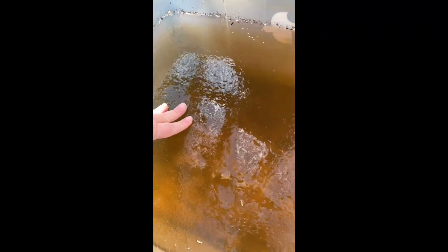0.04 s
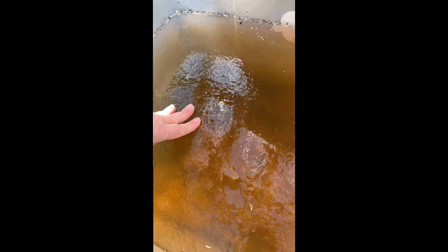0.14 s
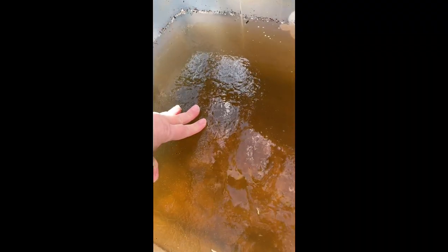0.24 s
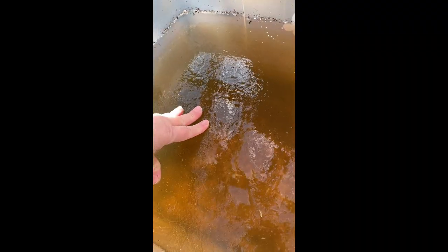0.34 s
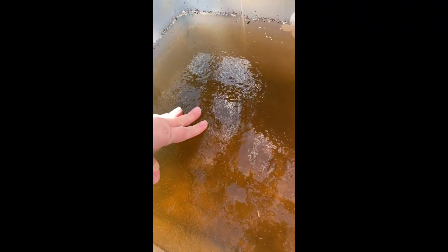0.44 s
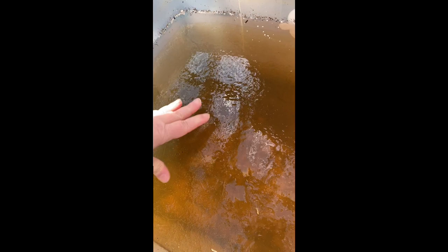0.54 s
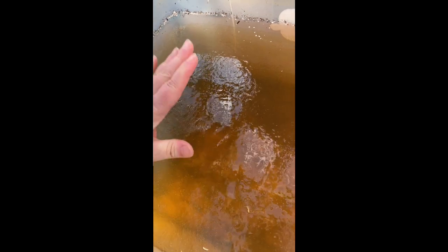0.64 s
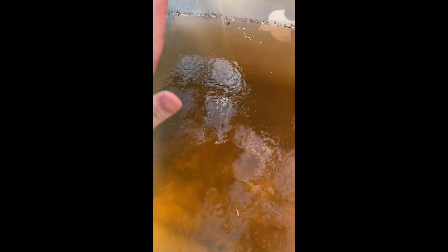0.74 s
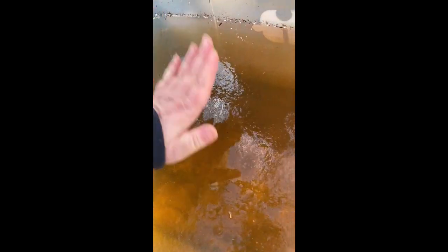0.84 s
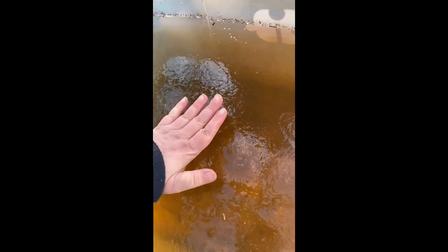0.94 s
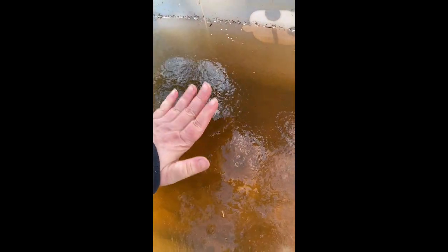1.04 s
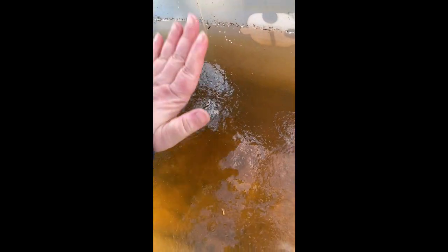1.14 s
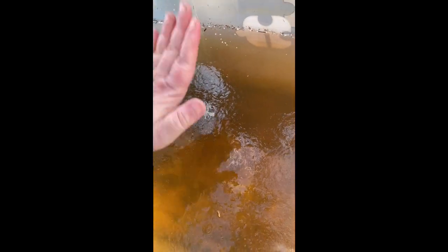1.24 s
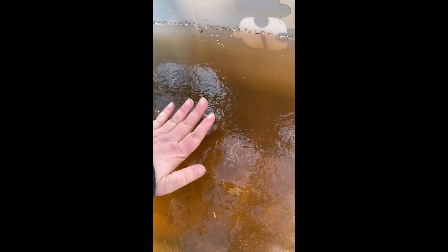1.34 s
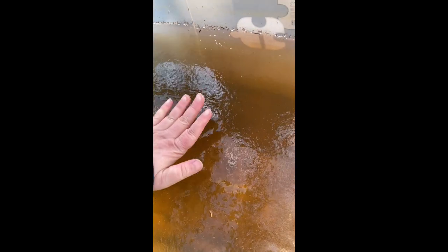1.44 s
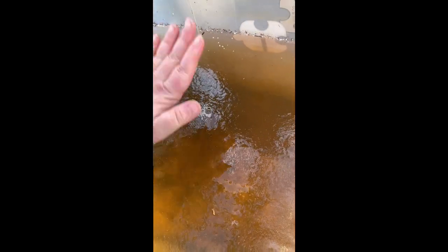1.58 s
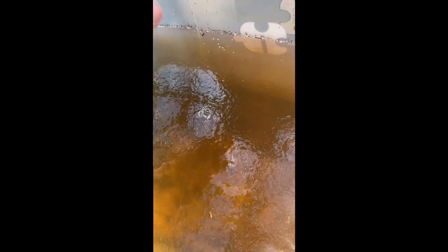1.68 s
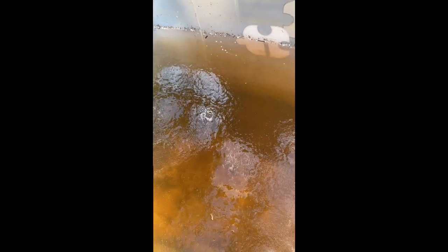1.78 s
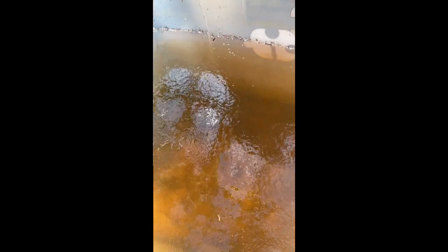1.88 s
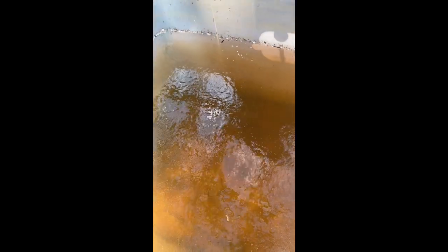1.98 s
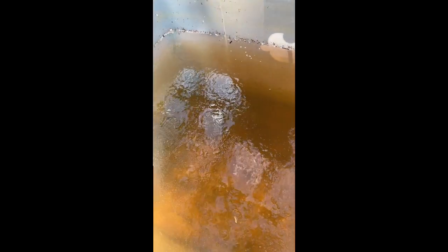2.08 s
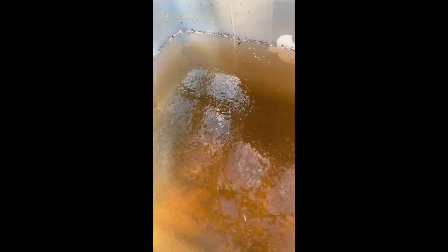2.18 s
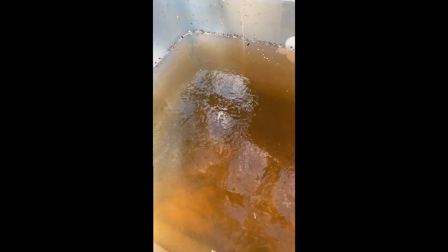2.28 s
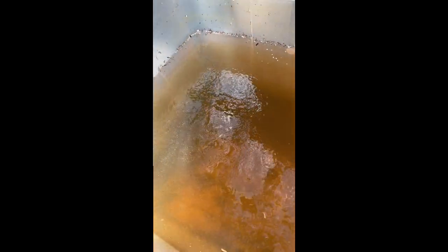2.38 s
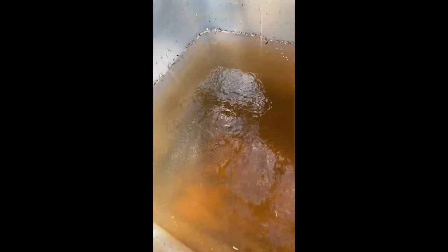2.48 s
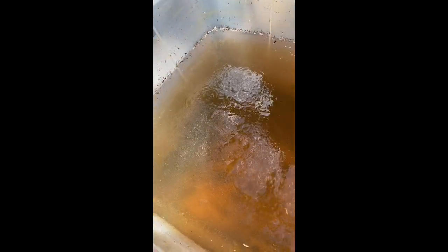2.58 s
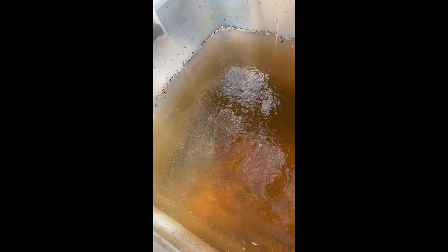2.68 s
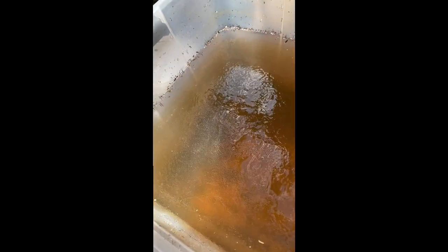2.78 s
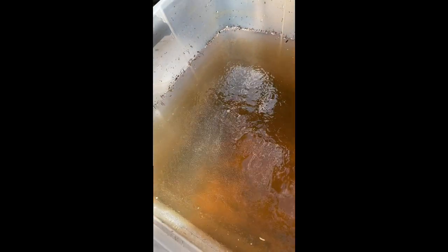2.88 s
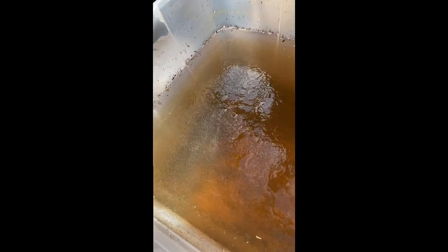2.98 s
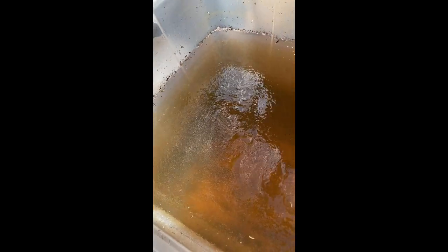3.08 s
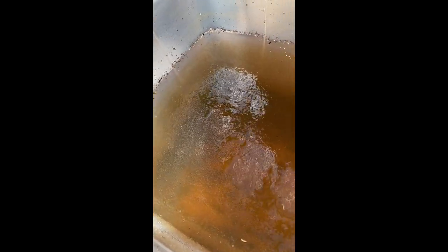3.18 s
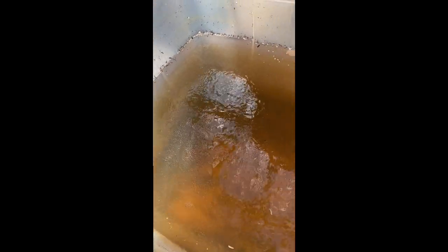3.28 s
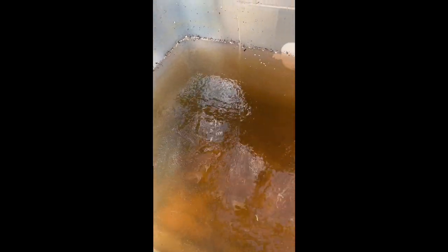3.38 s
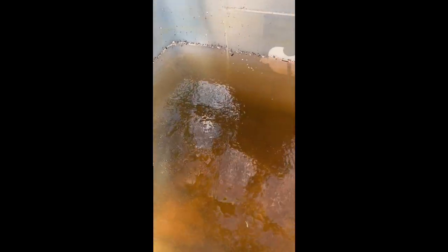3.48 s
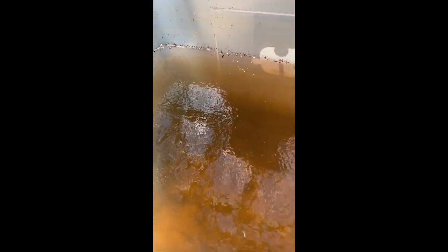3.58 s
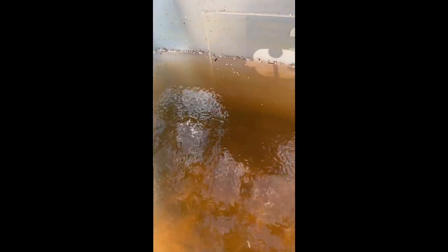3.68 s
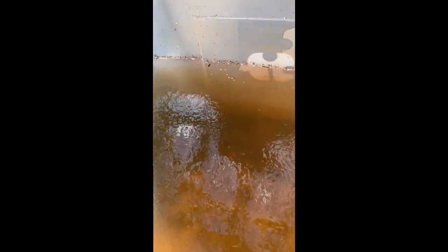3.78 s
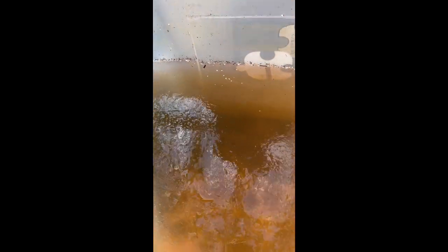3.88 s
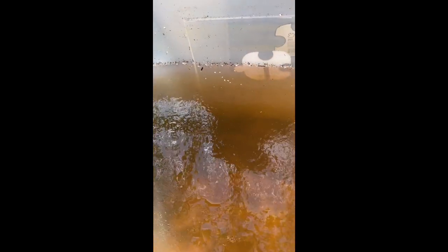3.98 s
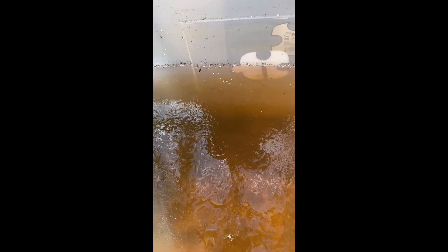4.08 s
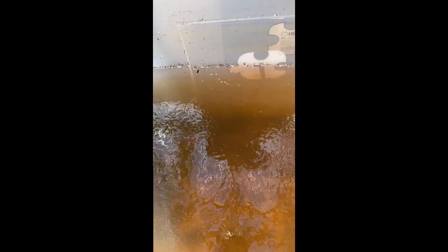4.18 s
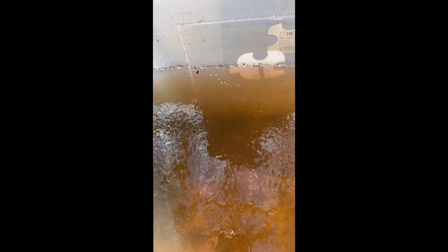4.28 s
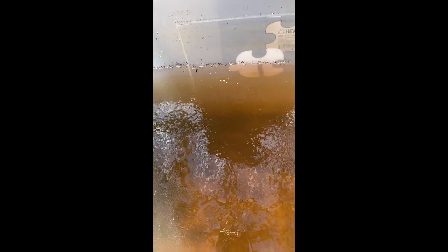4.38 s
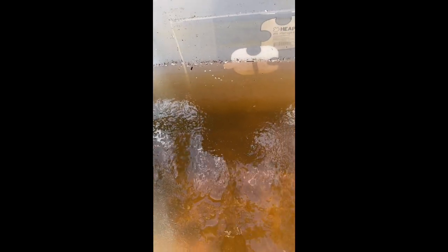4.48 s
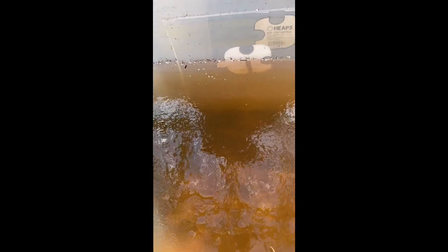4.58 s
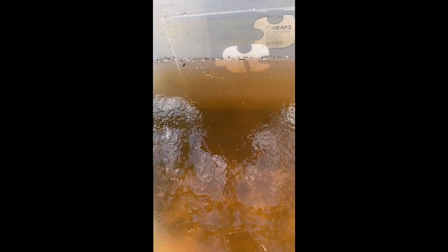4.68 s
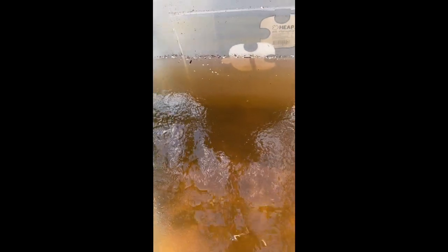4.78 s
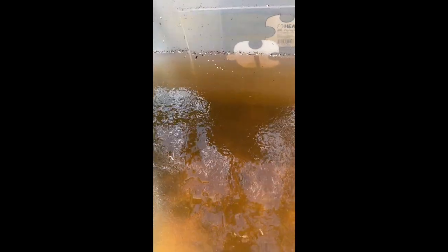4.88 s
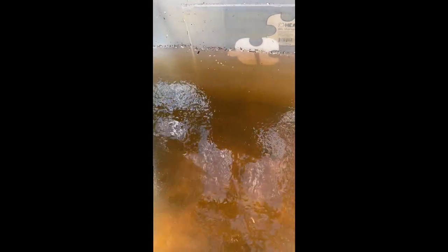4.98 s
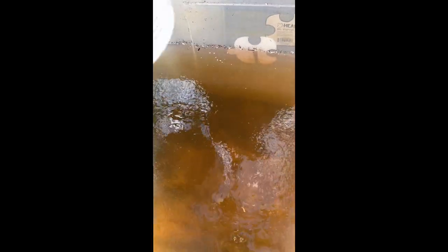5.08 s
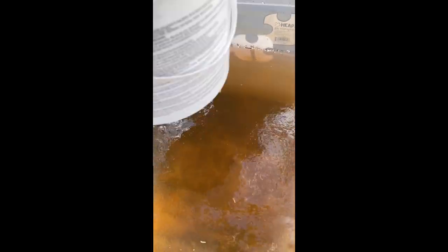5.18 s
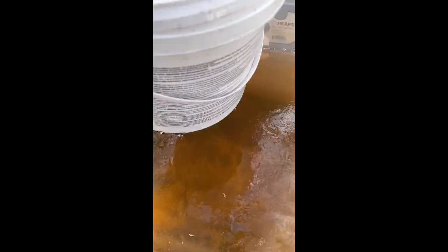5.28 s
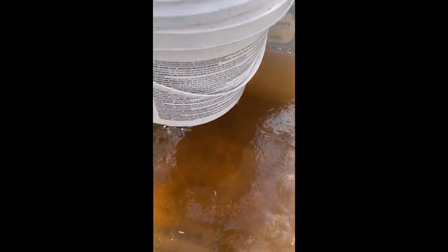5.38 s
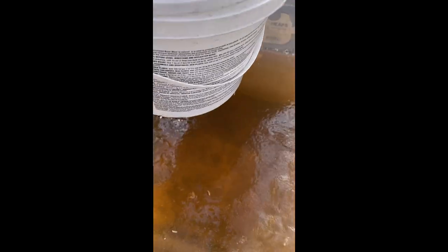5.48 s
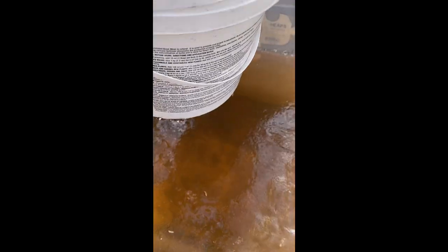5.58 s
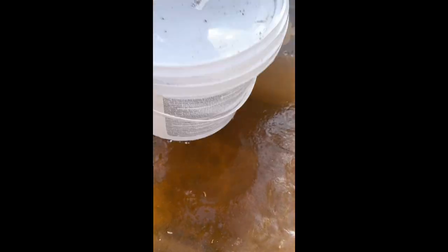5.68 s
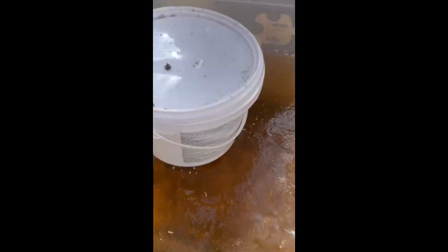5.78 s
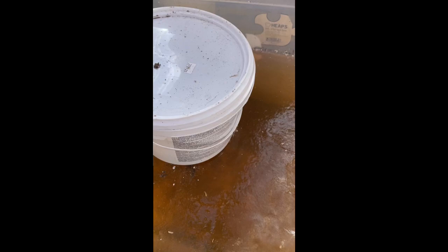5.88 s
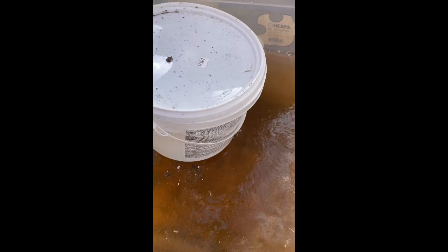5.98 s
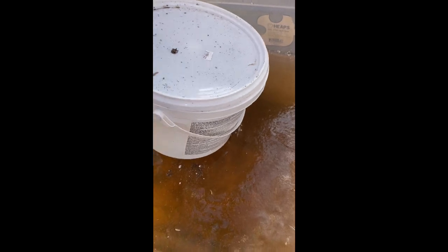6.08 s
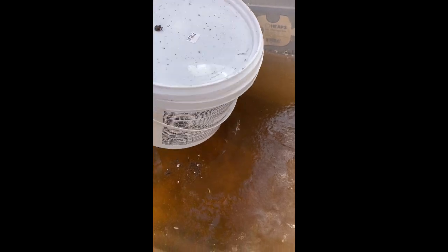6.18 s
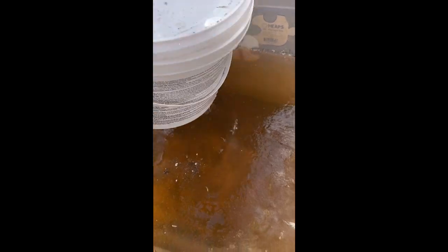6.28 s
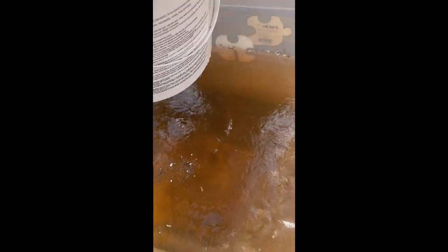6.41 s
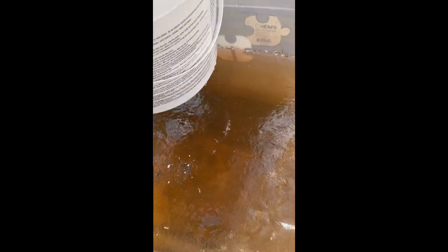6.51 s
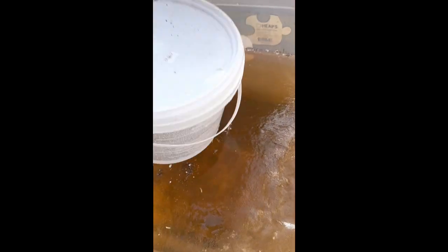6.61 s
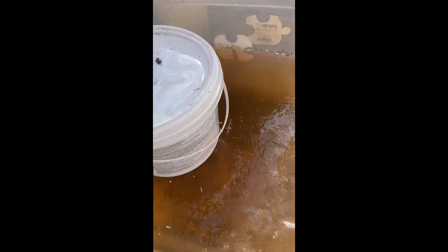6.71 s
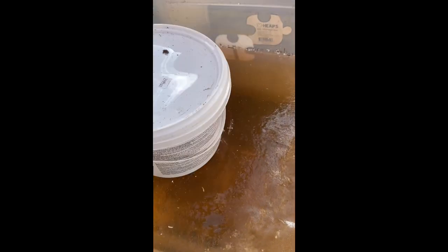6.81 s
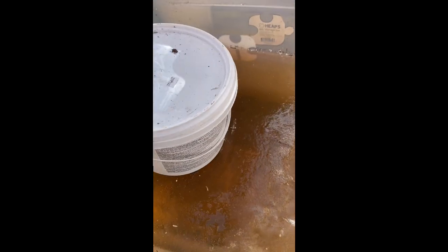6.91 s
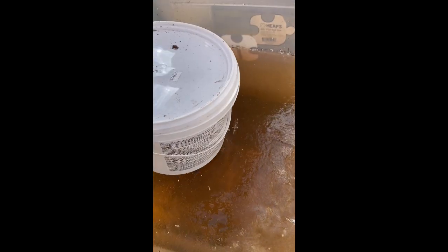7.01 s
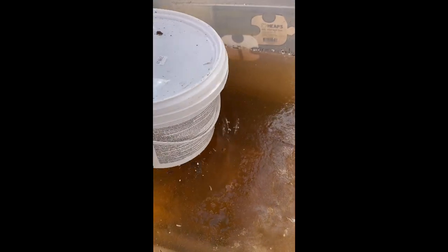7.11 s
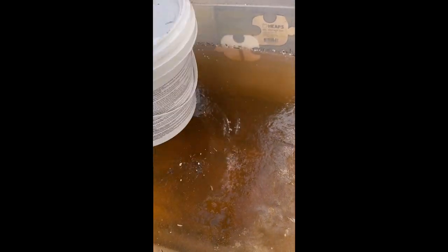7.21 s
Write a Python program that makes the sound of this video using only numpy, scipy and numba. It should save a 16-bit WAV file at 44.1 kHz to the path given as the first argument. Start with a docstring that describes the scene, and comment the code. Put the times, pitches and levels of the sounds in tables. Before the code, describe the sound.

Steady fan hum in a small greenhouse; a hand smacks ice twice, then a full plastic bucket booms against it twice, amid faint cloth swishes.

```python
"""A hand slaps the ice on a frozen plastic tub twice, then a full plastic bucket is knocked on it twice.
Each blow is a noise crack plus decaying modes of ice, tub, bucket and trapped air; rumble follows as water rocks.
Bumps and taps lie around the blows; a jacket sleeve swishes as grainy noise shaped by the speed of the arm.
A fan heater hums throughout in the small greenhouse: wavering tones over coloured noise.
The phone has two ports, cuts the top, and turns its gain down for loud blows."""
import sys
import numpy as np
from scipy import signal
from scipy.fft import rfft, irfft
from scipy.io import wavfile
from numba import njit

SR = 44100
rng = np.random.default_rng(int(sys.argv[2]) if len(sys.argv) > 2 else 0)


def store_wav(level_fs):
    """Save 16-bit WAV to argv[1]."""
    pcm = np.round(np.clip(np.atleast_2d(level_fs), -1, 1) * 32767)
    wavfile.write(sys.argv[1], SR, pcm.T.astype(np.int16))


N = 319725
T = np.arange(N) / SR
FREQ = np.maximum(np.fft.rfftfreq(N, 1 / SR), 1)

# All levels are relative unless noted.
# palm on ice: start_s, boom_db, smack_db, water_heave_db, smack_t60_s,
# palm_air_pocket_hz, pocket_db, finger_snap_hz, snap_db
PALM_SLAPS = [(0.988, -10, -9, -9, 0.057, 1382, -8.5, 5180, -27),
              (1.4154, -9, -9.5, -9.5, 0.035, 1103, -12.5, 4040, -13.5)]
# bucket on ice: start_s, ice_db, crack_db, water_heave_db, wall_ring_db, wall_tilt_db_per_octave,
# base_drum_hz, base_db
BUCKET_KNOCKS = [(5.8684, -10.5, -5, -10, -14.5, -6.5, 213.2, 3),
                 (6.7570, -10.5, -4.5, -29.5, -17.5, -5, 193.3, 4)]
# ice sheet in its tub: mode_hz, level_db, t60_s
ICE_MODES = [(122.2, -9.5, 0.19), (167.6, 1.5, 0.086), (220.4, 2, 0.085), (234.6, 4.5, 0.053),
             (264, -7, 0.037), (325.5, -6, 0.094), (443, -3, 0.044), (531, -7, 0.041), (1057, -6.5, 0.02)]
# bucket wall and wire handle: mode_hz, level_db, t60_s
WALL_MODES = [(363, 3, 0.063), (610, 8, 0.031), (776, -2, 0.028), (912, 1.5, 0.091), (1076, 9.5, 0.03),
              (1206, 3, 0.071), (1426, -8, 0.1), (2160, -28, 0.17), (2700, -30, 0.13), (2652, -34, 0.13),
              (3240, -25, .25), (3540, -32, 0.2), (3630, -29, .25)]
# palm contact spectrum: freq_hz, density_db
SMACK_SPECTRUM = [(150, -41.5), (500, 2), (1000, 5), (1900, 1), (2700, -1), (3900, 2), (5800, -1.5),
                  (10000, -5.5), (16000, -5.5)]
# hard contact spectrum: freq_hz, density_db
CRACK_SPECTRUM = [(150, -32), (600, 14), (1500, 6.5), (2700, 4.5), (5000, -3), (10000, -12), (16000, -16.5)]
# dull bumps against the tub: start_s, level_db, pitch_hz, t60_s, scuff_db
TUB_BUMPS = [(2.346, -31, 286, 0.042, -37), (2.393, -30, 77, 0.17, -52), (2.465, -23, 63, 0.12, -36.5),
             (3.390, -17, 182.6, 0.17, -39), (3.415, -16.5, 163.5, 0.13, -51.5),
             (3.737, -20, 262, 0.099, -32), (3.775, -25, 248.6, 0.18, -46), (4.378, -32, 81, 0.11, -46),
             (5.92, -14, 191, 0.091, -29), (5.973, -30, 179, 0.2, -55), (6.798, -25, 232, 0.17, -40)]
# scuff spectrum: freq_hz, density_db
SCUFF_SPECTRUM = [(60, -15), (280, -1), (600, -13), (1200, -23), (2500, -33.5), (8000, -50.5)]
# light taps of fingers and handle: start_s, level_db, ring_hz, ring_above_tap_db
LIGHT_TAPS = [(0.598, -33, 5000, -25), (.9673, -28.5, 2400, -21), (1.0401, -23.5, 5900, 6),
              (1.073, -39.5, 3300, 2), (1.360, -32.5, 2320, -8), (1.4926, -30.5, 5540, -1),
              (2.448, -40.5, 910, 9), (3.1537, -46, 5230, 4), (4.2037, -32, 3130, 6.5),
              (5.1293, -37.5, 3380, 3.5), (6.933, -33, 900, -17)]
# thin bright ticks of the jacket: start_s, level_db
JACKET_TICKS = [(0.237, -45.5), (1.8518, -49), (2.861, -48.5), (4.4843, -44), (4.629, -42), (5.75, -40.5),
                (6.1047, -38.5)]
TAP_TILT_DB_PER_OCTAVE, TICK_TILT_DB_PER_OCTAVE, TAP_RING_OCTAVES = 2.5, 7.5, 0.4

# slow arm strokes rubbing the sleeve: top_speed_s, level_db, rise_s, fall_s
SLOW_STROKES = [(.45, -55, .9, 2.4), (.61, -37.5, 0.021, .11), (1.07, -45.5, 0.2, 0.068),
                (1.47, -43.5, 0.11, .1), (2.35, -48.5, 0.32, 0.78), (3.2, -57.5, 0.19, 0.79),
                (3.57, -54.5, 0.091, 0.33), (3.95, -50.5, 0.26, 0.39), (4.21, -43.5, 0.096, 0.28),
                (4.39, -47.5, 0.07, 0.16), (5.02, -49.5, 0.19, 1.37), (6.25, -60, 0.44, 1.6)]
# quick arm swings with the bucket: top_speed_s, level_db, rise_s, fall_s
BUCKET_SWINGS = [(5.84, -40, 0.038, 0.094), (5.872, -27, 0.018, 0.095), (5.922, -26.5, 0.027, 0.03),
                 (6.0, -34, 0.039, 0.091), (6.75, -19.5, 0.098, 0.095), (6.96, -41, 0.27, 0.12)]
# slides in which the cuff weave sings: top_speed_s, level_db
CUFF_SLIDES = [(.5, -56), (2.35, -58.5)]
# slow rub spectrum: freq_hz, density_db
RUB_SPECTRUM = [(200, -1), (550, 2), (900, 0), (1350, -3.5), (1800, -2), (2300, 3), (3000, -4),
                (3900, -4.5), (5000, -4), (6300, -8), (10000, -13.5), (16000, -17)]
# quick swish spectrum: freq_hz, density_db
SWISH_SPECTRUM = [(200, -16), (600, -16), (860, -5), (1100, -8), (1450, -8), (1800, -7), (2450, -1),
                  (3200, -3), (3900, -4), (4800, -5.5), (6300, -12), (10000, -16), (16000, -17.5)]
CUFF_RISE_S, CUFF_FALL_S = 0.23, 0.256
# drop at rise_s before and fall_s after top speed; exponents of the drop
STROKE_DEPTH_DB, RISE_POWER, FALL_POWER = 19.5, 2.06, 1.07

# rocking water, relative to the ice boom
SLAP_WASH_DB, KNOCK_WASH_DB, WASH_RISE_S, WASH_T60_S = -30.5, -38.5, .07, 2.9

# fan and mains tones: tone_hz, level_db
FAN_TONES = [(119.5, -58.5), (174, -54.5), (241, -45), (283, -50), (317.6, -49), (410, -56.5), (522, -65),
             (608, -64.5), (694, -70.5)]
# blown air spectrum: freq_hz, density_db
AIR_SPECTRUM = [(20, -43), (40, -18.5), (58, -0.5), (90, -8.5), (130, -6.5), (190, 2.5), (290, -3.5),
                (430, -1), (560, -13), (800, -12), (1300, -25), (2300, -25.5), (5000, -34.5), (16000, -44)]
# strongest motor tone, varying as the phone moves through its standing wave: time_s, level_db
MOTOR_LEVEL = [(0, -45), (2.6, -44), (4.0, -48.5), (4.85, -51.5), (5.35, -40.5), (7.25, -41.5)]
MOTOR_HZ, FAN_DB = 361.2, -0.83
# the hum dips briefly after each knock and stays lower after the last
HUM_DIP_DB, HUM_DIP_LAG_S, HUM_DIP_S, HUM_END_DB = -8, 0.12, .065, -4.5

# microphone port balance: freq_hz, left_minus_right_db
PORT_BALANCE = [(60, 0), (200, 0), (380, -2.3), (700, 2.3), (1200, 3.2), (2400, 1.7), (4400, .6), (8000, 0)]
# microphone port phase: freq_hz, left_lead_rad
PORT_LEAD = [(60, .1), (140, .15), (280, .32), (600, .45), (1100, .55), (2070, 1.1), (2930, 1.6),
             (4200, 1.6), (5250, .9), (8200, -1.2), (10900, .7), (13000, 2.1)]
# deep dips in the phone's treble: center_hz, half_width_hz, depth_db
TREBLE_DIPS = [(7380, 690, 36), (13700, 580, 30)]
TOP_HZ = 15900


def slaps():
    """The palm smacks and pops its air pocket, the ice rings, and the sheet heaves on the water."""
    out = np.zeros((2, N))
    for start_s, boom_db, smack_db, heave_db, t60_s, pocket_hz, pocket_db, snap_hz, snap_db in PALM_SLAPS:
        smack = burst(SMACK_SPECTRUM, t60_s, hold_s=0.0026, rise_s=0.00075)
        snap = burst(resonance(snap_hz, 0.36), t60_s=0.029, hold_s=0.0019)
        add(out, start_s, undb(smack_db) * smack)
        add(out, start_s, undb(snap_db) * snap)
        add(out, start_s, undb(pocket_db) * ring([(pocket_hz, 3, .025)], lag_s=0.0013))
        add(out, start_s, undb(boom_db) * ring(ICE_MODES, lag_s=0.00578))
        add(out, start_s, undb(heave_db) * ring([(69.4, 8.5, 0.079)], lag_s=0.0106))
    return out


def knocks():
    """The bucket cracks on the ice; its base booms like a drum, sinking in pitch, and its wall rings."""
    out = np.zeros((2, N))
    for start_s, ice_db, crack_db, heave_db, wall_db, tilt_db, base_hz, base_db in BUCKET_KNOCKS:
        wall = [(hz, db + tilt_db * np.log2(hz / 1000), t60_s) for hz, db, t60_s in WALL_MODES]
        crack = burst(CRACK_SPECTRUM, t60_s=0.045, hold_s=0.00097, rise_s=0.00068)
        base = ring([(base_hz, 0, .09)], lag_s=0.00329, bend=0.55)
        heave = ring([(84, 5.5, 0.11), (154, -1.5, 0.098)], lag_s=0.00496)
        add(out, start_s, undb(crack_db) * crack)
        add(out, start_s, undb(ice_db) * ring(ICE_MODES, lag_s=0.0029))
        add(out, start_s, undb(base_db) * base)
        add(out, start_s, undb(heave_db) * heave)
        add(out, start_s, undb(wall_db) * ring(wall, lag_s=0.00231))
    return out


def bumps():
    """Soft contact with the tub: a cluster of low modes and a dull scuff, no crack."""
    out = np.zeros((2, N))
    for start_s, db, hz, t60_s, scuff_db in TUB_BUMPS:
        partials = [(1, 0), (.72, -9), (1.22, -8), (1.037, -13)]  # pitch ratio, dB
        modes = [(hz * ratio, partial_db, t60_s) for ratio, partial_db in partials]
        scuff = burst(SCUFF_SPECTRUM, t60_s=0.39, hold_s=0.0059, rise_s=0.001)
        add(out, start_s, undb(db) * ring(modes, lag_s=0))
        add(out, start_s - .006, undb(scuff_db) * scuff)
    return out


def taps():
    """Brief hard contact: a bright click and a short resonant ring."""
    out = np.zeros((2, N))
    for start_s, db, hz, ring_db in LIGHT_TAPS:
        click = burst(CRACK_SPECTRUM, t60_s=0.029, hold_s=0.0011, tilt_db=TAP_TILT_DB_PER_OCTAVE)
        ringing = burst(resonance(hz, TAP_RING_OCTAVES), t60_s=0.013, hold_s=0.0014)
        add(out, start_s, undb(db) * click)
        add(out, start_s, undb(db + ring_db) * ringing)
    return out


def jacket_ticks():
    """Tiny contacts of the jacket: short noise tilted to the treble."""
    out = np.zeros((2, N))
    for start_s, db in JACKET_TICKS:
        tick = burst(CRACK_SPECTRUM, t60_s=0.027, hold_s=0.0011, tilt_db=TICK_TILT_DB_PER_OCTAVE)
        add(out, start_s, undb(db) * tick)
    return out


def sleeve():
    """Threads of stiff cloth catch and slip: a grainy hiss that follows the speed of the arm."""
    slides = strokes([(peak_s, db, CUFF_RISE_S, CUFF_FALL_S) for peak_s, db in CUFF_SLIDES])
    slow = noise(RUB_SPECTRUM, apart=0.82) * strokes(SLOW_STROKES)
    cuff = noise(resonance(4600, 0.22), apart=0.46) * slides
    fast = noise(SWISH_SPECTRUM, apart=0.38) * strokes(BUCKET_SWINGS)
    grain_db = 1.76 * walk(35) + 0.78 * walk(600)
    rub = (slow + cuff + fast) * undb(grain_db)
    # ice echo; its delay shifts with arm height and moves the colour
    mirrored_s = T - 0.001248 * np.exp(0.156 * walk(2.04))
    echo = np.array([np.interp(mirrored_s, T, port) for port in rub])
    return 1.13 * (rub + 0.19 * echo)


def water():
    """Each blow sets the ice rocking on the water, the more the louder it boomed: low narrow noise."""
    power = 0
    for blows, wash_db in (PALM_SLAPS, SLAP_WASH_DB), (BUCKET_KNOCKS, KNOCK_WASH_DB):
        for start_s, boom_db, *_ in blows:
            t = np.maximum(T - start_s, 0)
            gain = undb(boom_db + wash_db) * (1 - np.exp(-t / WASH_RISE_S)) * fade(t, WASH_T60_S)
            power = power + gain ** 2
    spectrum = [(25, -12), (45, -20.5), (58, 9.0), (75, -20), (130, -31), (400, -86)]
    return noise(spectrum, apart=0.054) * np.sqrt(power)


def greenhouse(x, wet_db, t60_s, early_db):
    """Close panes return a quick flurry of echoes, then a faint bright tail."""
    t = T[:SR]
    colour = [(40, -18), (250, -0.5), (1000, -3.0), (2500, 0.0), (6000, -3.5), (16000, 5.5)]
    tail = noise(colour, size=SR, apart=0.32) * (t > .006)
    shape = undb(wet_db) * fade(t, t60_s) + undb(early_db) * fade(t, 0.12)
    return x + signal.fftconvolve(x, tail * shape, axes=1)[:, :N]


def heater():
    """Motor and blade tones waver over the rush of blown air; all dip after the knocks."""
    tones = sum(tone(hz, db + 0.5) for hz, db in FAN_TONES)
    air = noise(AIR_SPECTRUM, apart=1.0) * undb(-43.5 + 1.44 * walk(7.8))
    motor = tone(MOTOR_HZ, curve(MOTOR_LEVEL))
    dips_db = sum(HUM_DIP_DB * np.exp(-((T - start_s - HUM_DIP_LAG_S) / HUM_DIP_S) ** 2)
                  for start_s, *_ in BUCKET_KNOCKS)
    end_db = HUM_END_DB * np.clip((T - BUCKET_KNOCKS[-1][0]) / HUM_DIP_S, 0, 1)
    return ((tones + air) * undb(FAN_DB) + motor) * undb(dips_db + end_db)


def scene():
    """Everything close to the tub, in the greenhouse, over the water and the heater."""
    close = slaps() + knocks() + bumps() + taps() + jacket_ticks() + sleeve()
    return greenhouse(close, wet_db=-60.5, t60_s=1.0, early_db=-31.0) + water() + heater()


def ring(modes, lag_s=.004, bend=0):
    """Struck modes; low bending waves arrive late (lag_s at 200 Hz); bend sinks pitch as pressure lets go."""
    out = 0
    for hz, db, t60_s in modes:
        t = np.maximum(T[:SR // 2] - lag_s * np.sqrt(200 / hz), 0)
        swell = 1 - np.exp(-t * hz * 2)
        cycles = hz * (t + bend * 0.0064 * (1 - fade(t, 0.048)))
        out = out + undb(db) * swell * fade(t, t60_s) * np.sin(2 * np.pi * cycles)
    return out


def burst(points, t60_s, hold_s, tilt_db=0, rise_s=0.00035):
    """Contact noise: dense while the surfaces meet, then dying fast."""
    t = T[:SR // 4]
    shape = (1 - np.exp(-t / rise_s)) * fade(np.maximum(t - hold_s, 0), t60_s)
    return shape * noise(points, size=len(t), tilt_db=tilt_db, apart=0.53)


def stroke(peak_s, db, rise_s, fall_s):
    """Gain of one arm move: it speeds up until peak_s in a rounded arc, then slows in a straighter line."""
    before = np.maximum(peak_s - T, 0) / max(rise_s, .002)
    after = np.maximum(T - peak_s, 0) / max(fall_s, .002)
    drop_db = STROKE_DEPTH_DB * (before ** RISE_POWER + after ** FALL_POWER)
    return undb(db - np.minimum(drop_db, 150))


def strokes(rows):
    """Gain of a run of strokes; where they overlap their powers add."""
    return np.sqrt(sum(stroke(*row) ** 2 for row in rows))


def tone(hz, db):
    """A line of about the given rms level, wavering in pitch and level."""
    phase = 2 * np.pi * np.cumsum(hz + 1.2 * walk(6)) / SR
    return np.sqrt(2) * undb(db + 2.12 * walk(3.1)) * np.sin(phase)


def noise(points, size=N, tilt_db=0, apart=.25):
    """Coloured noise of rms 1 at two close ports, which differ more toward the treble."""
    hz = np.maximum(np.fft.rfftfreq(size, 1 / SR), 1)
    gain = undb(across(points, hz) + tilt_db * np.log2(hz / 3000))
    mid, side = rfft(rng.standard_normal((2, size))) * gain
    side = side * apart * hz / (hz + 700)
    pair = irfft(np.array([mid + side, mid - side]), size)
    return pair / pair.std()


def resonance(hz, octaves):
    """Spectrum of one resonance of the given width."""
    skirt = [(-4, -50), (-1.5, -18), (-.4, 0), (.4, 0), (1.5, -18), (4, -50)]
    return [(hz * 2 ** (step * octaves), db) for step, db in skirt]


def walk(rate_hz):
    """Smooth random wander with a spread of 1."""
    y = irfft(rfft(rng.standard_normal(N)) * np.exp(-(FREQ / rate_hz) ** 2), N)
    return y / y.std()


def fade(t, t60_s):
    """Exponential decay, 60 dB in t60_s."""
    return np.exp(-np.log(1000) * t / max(t60_s, .002))


def curve(rows):
    """Straight lines through (time_s, value) rows."""
    return np.interp(T, *np.transpose(rows))


def across(points, hz):
    """Straight lines through (freq_hz, value) points on a log axis."""
    freq_hz, value = np.transpose(points)
    return np.interp(np.log(np.maximum(hz, 1)), np.log(freq_hz), value)


def undb(db):
    """Decibels to gain."""
    return 10 ** (np.asarray(db) / 20)


def add(out, start_s, sound):
    """Mix a sound in at start_s."""
    start = int(start_s * SR)
    out[:, start:start + sound.shape[-1]] += sound[..., :N - start]


@njit
def follow(size, attack, release):
    """Level follower that rises fast and sinks slowly."""
    out, level = np.empty(len(size)), 0.
    for i in range(len(size)):
        level += (size[i] - level) * (attack if size[i] > level else release)
        out[i] = level
    return out


def record(dry):
    """Two ports with their own colour, gain control, rounded peaks and a cut top."""
    dips_db = sum(-depth_db * np.exp(-((FREQ - hz) / width_hz) ** 2) for hz, width_hz, depth_db in TREBLE_DIPS)
    # each port takes half the difference
    left = undb(across(PORT_BALANCE, FREQ) / 2) * np.exp(.5j * across(PORT_LEAD, FREQ))
    x = irfft(rfft(dry) * undb(dips_db) * np.array([left, 1 / left]), N)
    # time constants: 3.2 ms attack, 220 ms release
    loudness = follow(np.abs(x).max(axis=0), 1 / (0.0032 * SR), 1 / (.22 * SR))
    x = x * np.maximum(loudness / undb(-11.5), 1) ** -.6
    rounded = x / (1 + (x / .92) ** 4) ** .25
    top_cut = signal.ellip(8, .2, 70, TOP_HZ, fs=SR, output="sos")
    return signal.sosfilt(top_cut, rounded)


dry = scene()
out = record(dry)
store_wav(out)
```